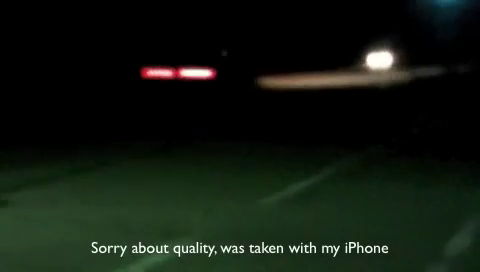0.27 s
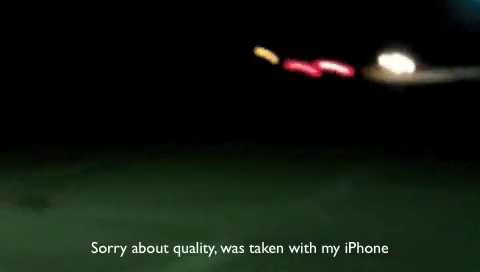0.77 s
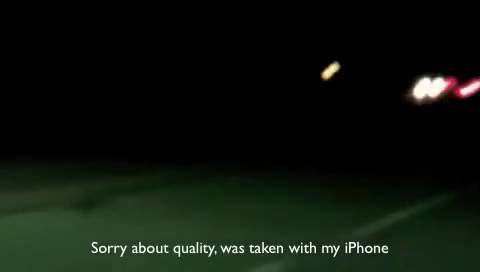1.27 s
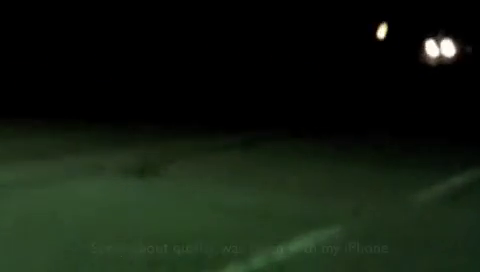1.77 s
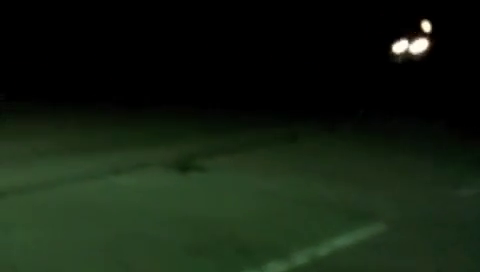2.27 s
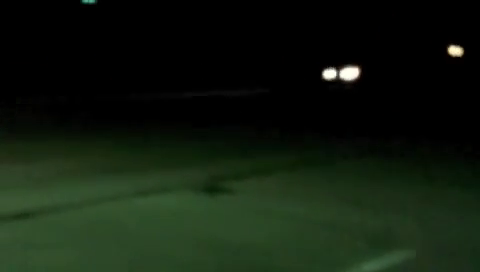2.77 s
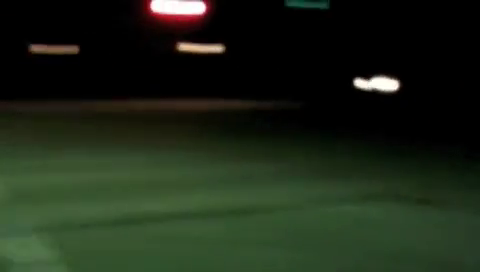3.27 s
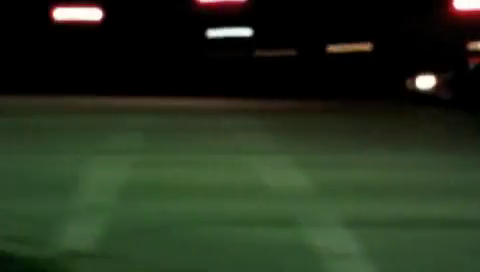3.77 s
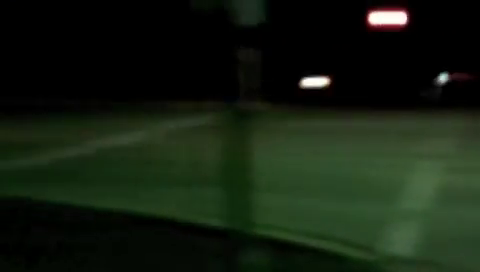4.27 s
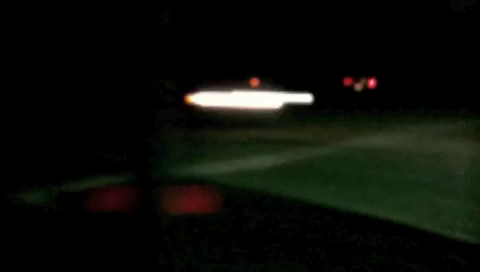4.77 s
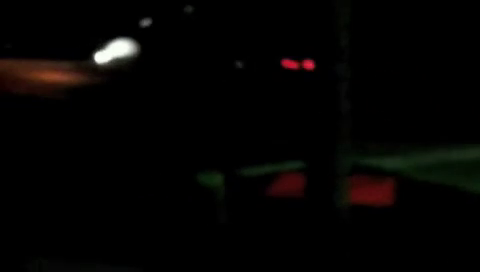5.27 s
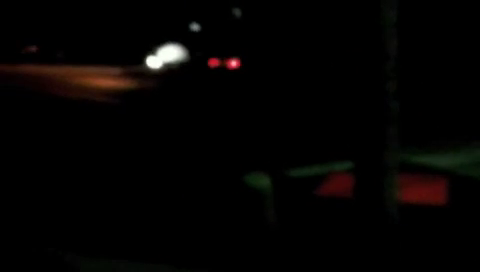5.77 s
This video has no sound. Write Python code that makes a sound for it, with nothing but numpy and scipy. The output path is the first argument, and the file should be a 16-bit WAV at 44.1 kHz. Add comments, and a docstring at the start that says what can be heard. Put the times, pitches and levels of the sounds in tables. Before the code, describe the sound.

A night roadside, heard through a small microphone with little deep bass and a cut top. From 0 s, tyre roar dominates, with the airy hiss of a car rolling away that swells slightly at about 0.25 s and fades after 0.7 s. A distant eight-cylinder exhaust drones faintly at a low-mid pitch, climbing steadily and beating in and out with reflections, stronger from 1 s. Tiny close ticks come near 1.2 and 2 s. The drone sinks a little around 2.5 to 3 s, then surges from 3.2 s, loud, raspy and rich, with thin whines and brighter tyre hiss, peaking around 3.6 to 4.7 s. At 4.8 s the throttle lifts; overtones thin and pitch slides down. At about 5.26 s the next gear bites with a brief bark, pitch plunges by 5.6 s with a short slap echo, then holds low, wobbling and burbling over tyre noise until 6 s.

```python
"""Tyre roar and the airy hiss of a car rolling away open a night road; a loud eight-cylinder nears.
Its open exhaust, a sum of firing harmonics and crank orders, climbs in pitch and fades in and out with
reflections; the overtones thin as the throttle lifts, and the pitch drops as the next gear bites.
Tyres, hiss, rumble and burble are shaped noise; passing whines and close ticks are sines."""
import sys
import numpy as np
from scipy import signal
from scipy.fft import rfft, irfft, next_fast_len
from scipy.io import wavfile
from scipy.ndimage import map_coordinates

SR = 44100
rng = np.random.default_rng(int(sys.argv[2]) if len(sys.argv) > 2 else 0)


def file_out(sig):
    """Save sig as 16-bit WAV at sys.argv[1]."""
    # one column per channel
    cols = np.atleast_2d(sig).T
    # limit, then scale
    lim = np.clip(cols, -1, 1)
    pcm = np.round(lim * 32767).astype(np.int16)
    wavfile.write(sys.argv[1], SR, pcm)


N = 265923

# Spectra are relative: their noise is scaled to rms 1 before its level is set.

# firing rate [t/s, f/Hz]
FIRING_RATE = [(0, 163.9), (.45, 166.5), (1, 173.7), (1.6, 178), (2.1, 186.5), (2.7, 190.4), (3.1, 194.7),
               (3.6, 199.1), (4, 202.3), (4.3, 203.5), (4.78, 202.7), (4.9, 194.5), (5.22, 181.3),
               (5.28, 183.9), (5.34, 180.5), (5.5, 143.8), (5.58, 130.1), (5.66, 135.5), (5.73, 137.4),
               (5.81, 135.4), (5.89, 138), (6.03, 136)]
# harmonic 1 before its fades, as the car nears [t/s, level/dB]
BOOM_LEVEL = [(0, -40), (.6, -38), (.95, -40), (1.06, -30), (1.16, -34), (1.28, -29), (1.35, -32.5),
              (1.47, -25.5), (1.52, -31.5), (1.56, -31), (1.62, -31), (1.77, -29.5), (1.82, -32.5),
              (1.87, -27.5), (1.96, -33), (2.13, -34), (2.25, -35.5), (2.35, -29.5), (2.43, -31),
              (2.5, -34.5), (2.95, -38.5), (3.3, -26), (3.63, -21), (4.05, -20.5), (4.2, -23.5), (4.3, -21),
              (4.36, -22.5), (4.44, -24), (4.5, -23), (4.7, -24), (4.92, -27.5), (5.14, -26.5), (5.22, -30),
              (5.28, -23), (5.33, -23.5), (5.38, -22), (5.47, -30), (5.7, -30.5), (5.85, -35), (6.03, -36)]
# overtones at open throttle, before fades and dip [t/s, levels of harmonics 2, 3, 4, 5 /dB]
OVERTONE_LEVELS = [(0, -60, -65, -57, -57), (.8, -53.5, -62, -67, -61), (1.15, -53.5, -59, -67, -68),
                   (1.6, -49, -63, -59.5, -62), (2.2, -50, -58, -59.5, -63), (2.8, -47.5, -58.5, -64, -61),
                   (3.05, -49.5, -52, -52, -61), (3.25, -42.5, -47, -44, -45), (3.38, -42, -50, -41.5, -56),
                   (3.5, -34.5, -48, -40, -61), (3.7, -37, -53, -42.5, -41),
                   (4.15, -37.5, -43.5, -41.5, -51), (4.3, -36.5, -43, -32, -48),
                   (4.45, -37, -36, -35, -43), (4.62, -39, -34.5, -34, -40.5), (4.8, -36.5, -39, -40, -42),
                   (5.15, -34, -47, -56, -60), (5.245, -34, -55, -55, -58), (5.27, -29, -36.5, -42.5, -58),
                   (5.35, -32, -33, -41.5, -43), (5.42, -31, -49, -42, -42), (5.52, -32.5, -51, -41, -50),
                   (5.6, -30.5, -49, -52, -45), (5.8, -33, -46, -54, -53), (5.9, -31, -47, -50, -47),
                   (6.03, -33, -47, -57, -53)]
OVERTONE_WAVER_DB = 1.3, 2.0, 2.3, 2.2  # harmonics 2 to 5
# fades of harmonic 1 against a reflection, one turn from row to row [t/s, level/dB, above 0 read as 0]
BOOM_FADES = [(.45, -3), (.72, 3), (.83, -3), (1.005, -13), (1.43, -25), (1.73, -19), (2.07, -15),
              (2.39, -31), (2.62, -7), (2.8, -17), (2.88, -1), (2.99, 0), (3.88, -7), (4.38, -11),
              (4.57, -3.5), (4.72, 8), (4.84, -13), (4.99, -1.5), (5.09, -5), (5.18, -7), (5.25, -8),
              (5.4, -6.5), (5.6, -5), (5.86, -3), (5.97, -5), (6.1, 0)]
# own fades of harmonics 2, 3 and 4, likewise [t/s, level/dB]
SECOND_FADES = [(.72, -7), (1.0, -2), (1.42, -7), (1.75, -3), (1.92, -5), (2.07, -6), (2.5, -0.5),
                (3.11, -3), (3.55, -6), (4.0, -3), (4.35, 10), (4.58, -6.5), (4.83, -11), (5.13, -6),
                (5.25, -7), (5.62, 0), (5.8, 1), (5.97, -3), (6.1, -7)]
THIRD_FADES = [(3.0, -3), (3.3, -1), (3.56, -13), (3.69, -15), (3.87, -17), (4.0, 1), (4.35, -3.5),
               (4.51, -6), (4.84, -2), (5.43, -14), (5.64, 1), (5.79, -8), (6.1, 0)]
FOURTH_FADES = [(3.0, 0), (3.24, -3), (3.51, -8), (3.65, -11), (3.76, -8), (3.9, -19), (4.02, -11),
                (4.11, -16), (4.23, -13), (4.36, -6), (4.53, -7), (4.62, 1), (4.84, -8), (5.24, 0),
                (5.56, -6), (5.8, -5), (5.96, -6)]
FIFTH_FADE_SHARE = 0.28  # share of each boom fade, in dB, that harmonic 5 takes
# ground dip the overtones pass through, placed for the rest hump [f/Hz, level/dB]
GROUND_DIP = [(250, 1), (400, 0.5), (480, -3.5), (545, -5.5), (600, -3), (690, 2.5), (800, -1.5),
              (900, -4.5), (1050, -3)]
# throttle shut, starts to open again; time to shut, to open; change in the overtones
SHUT_AT_S, BITE_S, SHUTTING_S, OPENING_S, LIFT_DB = 4.83, 5.258, 0.024, 0.02, -9
# rasp of the crank orders [f/Hz, level/dB]
RASP_SPECTRUM = [(230, -5), (310, -2.5), (420, -9), (520, -12.5), (700, -9), (900, -1), (1150, -2.5),
                 (1350, -10.5), (1650, -7.5), (1900, -5.5), (2150, -35), (2450, -8), (2900, -40)]
# level with the louder of harmonics 4 and 5 at RASP_REF_DB; share of its swing, dB per dB
RASP_DB, RASP_REF_DB, RASP_FOLLOWS = -43, -45, 0.44
# walls along the road [delay/s, level/dB]
ROADSIDE_ECHOES = [(.09, -19), (.17, -18)]
# far wall that throws the boom back while the revs drop [delay/s, level/dB]
FAR_WALL_SLAPS = [(.12, -11.5), (0.229, -21)]
SLAP_S, SLAP_END_S, SLAP_RISE_S, SLAP_FALL_S = 5.4, 5.62, 0.065, 0.14
# lines that stand out of the rasp [start t/s, end t/s, start f/Hz, end f/Hz, rms level at mid-swell/dB]
WHINE_LINES = [(1.219, 1.95, 436, 460, -58), (2.806, 3.26, 1533, 1565, -48),
               (3.399, 3.621, 940, 941, -44.5), (3.801, 4.196, 1150, 1170, -45.5),
               (3.996, 4.849, 1616, 1614, -47), (4.193, 4.79, 1670, 1675, -49),
               (4.039, 4.293, 1570, 1580, -49), (4.503, 4.89, 1056, 1046, -42.5)]

# rumble between the harmonics [f/Hz, level/dB per Hz]
RUMBLE_SPECTRUM = [(25, -61), (50, -53), (80, -19), (120, -8), (170, 11.5), (250, 4), (350, 5.5), (430, -3),
                   (520, -12.5), (700, -15)]
# level with BOOM_LEVEL at RUMBLE_REF_DB; share of its swing, dB per dB
RUMBLE_DB, RUMBLE_REF_DB, RUMBLE_FOLLOWS = -48.5, -30, 0.19
SURGE_S, SURGE_DB, SURGE_RISE_S, SURGE_FALL_S = 5.37, 7, 0.93, 0.065  # swell as the revs are dragged down
# rough exhaust noise as the next gear pulls [f/Hz, level/dB per Hz]
BURBLE_SPECTRUM = [(330, -30), (400, -1), (500, -1), (600, 1), (700, -10), (850, -32)]
BURBLE_S, BURBLE_RISE_S, BURBLE_DB = 5.5, 0.16, -49

# tyre roar [t/s, f of second hump/Hz, levels of humps 1, 2, 3 /dB, of low hiss/dB, of high hiss/dB]
ROAD_LEVELS = [(0, 1885, -40.5, -45.5, -57, -58, -61.5), (.4, 1940, -43, -45.5, -62.5, -61.5, -63.5),
               (.9, 1910, -42.5, -46.5, -63, -62.5, -67.5), (1.5, 1824, -48, -50, -61, -61, -66.5),
               (1.75, 1778, -45, -44, -57, -60.5, -65.5), (2.2, 1671, -46, -47.5, -56, -61, -67),
               (2.8, 1655, -47, -45, -54, -58.5, -62.5), (3.1, 1707, -43.5, -41.5, -48.5, -53.5, -57.5),
               (3.5, 1727, -44.5, -41.5, -47.5, -52.5, -54.5), (3.9, 1721, -42.5, -38.5, -49, -52, -53),
               (4.3, 1688, -40.5, -39, -50, -50, -50.5), (4.7, 1697, -42.5, -40, -51, -52, -53),
               (4.9, 1703, -43.5, -41, -50.5, -56.5, -56.5), (5.05, 1750, -44, -39, -52.5, -56.5, -58.5),
               (5.25, 1862, -39.5, -40.5, -53.5, -58, -60), (5.5, 1776, -46, -49.5, -56, -59, -62.5),
               (5.7, 1619, -42.5, -42, -52, -60.5, -64), (6.03, 1704, -45, -43, -54, -56.5, -63)]
# slides with the geometry [t/s, f of first hump/Hz, of third hump/Hz, of low hiss/Hz, of high hiss/Hz]
COLOUR_SLIDES = [(0, 923, 2400, 3900, 7100), (.6, 951.3, 2800, 4100, 6800), (1.2, 957, 2600, 3760, 6540),
                 (1.8, 929, 2350, 4130, 6640), (2.5, 889.6, 2370, 4020, 6700),
                 (3.2, 903.6, 2360, 3940, 6700), (4, 888, 2440, 4030, 6940), (4.8, 880.7, 2450, 4000, 6850),
                 (5.3, 927.5, 2450, 4150, 7050), (5.601, 908, 2270, 4350, 7300),
                 (6.03, 899, 2270, 3940, 6600)]
SLIDE_REST_HZ = 900, 2400, 4000, 6800  # same four columns, where the spectra put them
HUMP_REST_HZ = 1720  # second hump
# humps between ground-reflection dips [f/Hz, level/dB per Hz]
FIRST_HUMP = [(380, -12), (440, -13), (530, -27), (600, -11), (670, -6), (800, 2.5), (1000, 1), (1200, -5),
              (1400, -11.5), (1700, -31.5)]
SECOND_HUMP = [(1100, -28), (1350, -8), (1550, 0.5), (1750, 3), (1950, -1), (2150, -11.5), (2500, -31.5)]
THIRD_HUMP = [(1900, -51), (2150, -3), (2500, -1.5), (2750, -7.5), (3100, -23), (3600, -37)]
# flicker of humps 1, 2, 3, for each of two drifts [level/dB]
HUMP_FLICKER_DB = [0.45, 0.5, 0.96]
# tyre hiss, low and high band [f/Hz, level/dB per Hz]
LOW_HISS = [(2700, -8), (3000, -2), (3250, -5.5), (3600, 2), (4000, 0), (4800, -2), (5400, -6), (6000, -12)]
HIGH_HISS = [(5000, -40), (5800, -10), (6500, -0.5), (7200, -3.5), (7900, -7.5), (9500, -5), (10300, -14.5),
             (12000, -22), (13300, -21.5), (14500, -25), (15700, -21), (16500, -47)]

# airy hiss of the car rolling away [f/Hz, level/dB per Hz]
LEAVING_HISS = [(4800, -28), (5300, -2.5), (5700, -7), (6400, 3), (7400, 0), (8000, -18), (9000, -21),
                (10500, -15), (11500, -28)]
LEAVING_S, LEAVING_HOLD_S, LEAVING_DB, LEAVING_RISE_S = 0.24, 0.48, -59.5, 0.07
LEAVING_BEFORE_DB, LEAVING_FADE_DB_PER_S, LEAVING_FLICKER_DB = -5, -37, 0.6
# its tyres, lower down [f/Hz, level/dB]
LEAVING_ROAR = [(260, -30), (340, -3), (450, -0.5), (530, -6), (600, -25), (1100, -24), (1300, -5),
                (1500, 0), (1700, -25)]
LEAVING_ROAR_DB, LEAVING_ROAR_DB_PER_S = -50, -8.5

# small ticks close by [t/s, level before rise and decay/dB, f/Hz, t60/s]
CLOSE_TICKS = [(1.1688, -47, 8000, .004), (1.1715, -38, 6700, .005), (1.182, -41, 5910, .004),
               (1.9673, -34, 10000, 0.0022)]
TICK_RISE_S = 0.0004
CUTOFF_HZ = 15750  # 60 dB down from here up


def exhaust(cycles):
    """Firing harmonics plus rasp; walls return the rasp, and a far wall the boom as revs drop."""
    lift_db = LIFT_DB * pulse(SHUT_AT_S, BITE_S, SHUTTING_S, OPENING_S)
    overtones_db = in_time(OVERTONE_LEVELS) + lift_db
    swells = beating(BOOM_FADES)
    boom = swells * from_db(in_time(BOOM_LEVEL)[0]) * partial(cycles, 1, waver_db=0.98, wander=0.033)
    tones = overtones(cycles, overtones_db, swells)
    slap_gate = pulse(SLAP_S, SLAP_END_S, SLAP_RISE_S, SLAP_FALL_S)
    slaps = slap_gate * walls(boom, FAR_WALL_SLAPS)
    buzz = rasp(cycles, overtones_db)
    return boom + tones + slaps + buzz + walls(buzz)


def overtones(cycles, levels_db, swells):
    """Harmonics 2 to 5, each with its fades, through a ground dip that slides with the second road hump."""
    fades = [beating(SECOND_FADES), beating(THIRD_FADES), beating(FOURTH_FADES), swells ** FIFTH_FADE_SHARE]
    # scaling the frequency slides the dip
    seen_hz = in_time(FIRING_RATE)[0] * HUMP_REST_HZ / in_time(ROAD_LEVELS)[0]
    dip_hz, dip_db = np.transpose(GROUND_DIP)
    out = np.zeros(N)
    for harmonic, db, fade, waver_db in zip(range(2, 6), levels_db, fades, OVERTONE_WAVER_DB):
        through_dip_db = np.interp(harmonic * seen_hz, dip_hz, dip_db)
        gain = from_db(db + through_dip_db + 0.3 * drift(11.0)) * fade
        out += gain * partial(cycles, harmonic, waver_db, wander=0.076)
    return out


def rasp(cycles, overtones_db):
    """Weak lines at the crank orders: the four firings of a turn are uneven."""
    # multiples of the firing rate; whole ones up to 5 are the harmonics
    multiples = [k / 4 for k in range(5, 50) if k % 4 or k > 20]
    lines = sum(partial(cycles, multiple, waver_db=5.5, wander=0.06) for multiple in multiples)
    swing_db = overtones_db[2:].max(axis=0) - RASP_REF_DB
    return from_db(RASP_DB + RASP_FOLLOWS * swing_db) * rms_one(shape(lines, RASP_SPECTRUM))


def whines():
    """Gliding sines, each swelling and fading once."""
    out, t = np.zeros(N), np.arange(N) / SR
    for start_s, end_s, start_hz, end_hz, db in WHINE_LINES:
        done = np.clip((t - start_s) / (end_s - start_s), 0, 1)
        hz = start_hz + (end_hz - start_hz) * done
        phase = 2 * np.pi * np.cumsum(hz) / SR + 0.76 * drift(6.3)
        swell = np.sqrt(2 * np.sin(np.pi * done).clip(0))
        out += from_db(db + 2.1 * drift(7.6)) * swell * np.sin(phase)
    return out


def rumble():
    """Low exhaust noise: follows the boom a little, swells at the gear change."""
    swing_db = in_time(BOOM_LEVEL)[0] - RUMBLE_REF_DB
    surge_db = SURGE_DB * pulse(SURGE_S, SURGE_S, SURGE_RISE_S, SURGE_FALL_S)
    level_db = RUMBLE_DB + RUMBLE_FOLLOWS * swing_db + surge_db
    return from_db(level_db) * coloured(RUMBLE_SPECTRUM, patchy_db=2.5)


def burble():
    """Under the load of the next gear, rough noise fills the gap between the overtones."""
    swell = pulse(BURBLE_S, N / SR, BURBLE_RISE_S, 1)
    return from_db(BURBLE_DB) * swell * coloured(BURBLE_SPECTRUM, patchy_db=3.5)


def road(cycles):
    """Tyre noise humps between sliding ground-reflection dips; hiss swells a little with each firing."""
    second_hz, *humps_db, low_db, high_db = in_time(ROAD_LEVELS)
    first, third, low, high = (hz / rest for hz, rest in zip(in_time(COLOUR_SLIDES), SLIDE_REST_HZ))
    humps = FIRST_HUMP, SECOND_HUMP, THIRD_HUMP
    slides = first, second_hz / HUMP_REST_HZ, third
    roar = np.zeros(N)
    for hump, db, flicker_db, slide in zip(humps, humps_db, HUMP_FLICKER_DB, slides):
        roar += from_db(db) * coloured(hump, flicker_db, slide)
    low_hiss = from_db(low_db) * coloured(LOW_HISS, 0.47, low)
    high_hiss = from_db(high_db) * coloured(HIGH_HISS, 0.65, high)
    firing_swell = 1 + 0.053 * np.sin(2 * np.pi * cycles)
    return roar + (low_hiss + high_hiss) * firing_swell


def leaving():
    """The other car's hiss opens up, holds, then fades with distance; its roar fades from the start."""
    t = np.arange(N) / SR
    before_db = LEAVING_BEFORE_DB * np.clip((LEAVING_S - t) / LEAVING_RISE_S, 0, 1)
    after_db = LEAVING_FADE_DB_PER_S * np.maximum(t - LEAVING_S - LEAVING_HOLD_S, 0)
    hiss = from_db(LEAVING_DB + before_db + after_db) * coloured(LEAVING_HISS, LEAVING_FLICKER_DB)
    roar_db = LEAVING_ROAR_DB + LEAVING_ROAR_DB_PER_S * t
    return hiss + from_db(roar_db) * coloured(LEAVING_ROAR, patchy_db=2.0)


def ticks():
    """Sines that start fast and decay within milliseconds."""
    out, t = np.zeros(N), np.arange(300) / SR
    for s, db, hz, t60_s in CLOSE_TICKS:
        at = round(s * SR)
        envelope = from_db(db - 60 * t / t60_s) * np.minimum(t / TICK_RISE_S, 1)
        out[at:at + len(t)] += envelope * np.sin(2 * np.pi * hz * t)
    return out


def partial(cycles, multiple, waver_db, wander):
    """One engine order, rms 1 before its waver in level; phase wanders as firings and air vary."""
    start = rng.uniform(0, 2 * np.pi)
    phase = 2 * np.pi * multiple * cycles + wander * multiple * drift(17.3) + start
    return np.sqrt(2) * from_db(waver_db * drift(17.7)) * np.sin(phase)


def beating(fades):
    """Direct sound plus one reflection, one phase turn between fades: round lobes, sharp nulls."""
    s, depth_db = np.transpose(fades)
    null_gain = np.minimum(from_db(depth_db), 1)
    turns, null = in_time(np.c_[s, np.arange(len(s)), null_gain])
    echo = (1 - null) / (1 + null)
    return np.abs(1 - echo * np.exp(2j * np.pi * turns)) / (1 + echo)


def walls(x, echoes=ROADSIDE_ECHOES):
    """Late copies; they beat against the direct tone while the pitch moves."""
    return sum(from_db(db) * np.pad(x, (round(s * SR), 0))[:N] for s, db in echoes)


def coloured(spectrum, patchy_db, stretch=1):
    """Flickering noise of this spectrum, read faster or slower so its humps slide; rms 1."""
    noise = shape(rng.standard_normal(next_fast_len(2 * N)), spectrum)
    read_at = np.cumsum(stretch * np.ones(N))
    slid = map_coordinates(noise, [read_at], order=3, mode="wrap")
    return rms_one(slid * from_db(patchy_db * (drift(6.9) + drift(10.0))))


def shape(x, spectrum):
    """Filter x by this spectrum, interpolated over log frequency; -90 dB outside it."""
    hz = np.maximum(np.fft.rfftfreq(len(x), 1 / SR), 1)
    point_hz, point_db = np.transpose(spectrum)
    gain_db = np.interp(np.log(hz), np.log(point_hz), point_db, -90, -90)
    return irfft(rfft(x) * from_db(gain_db), len(x))


def drift(rate_hz):
    """Slow chance: noise through a double one-pole low-pass, spread 1."""
    step = 40  # samples per drift value
    pole = np.exp(-2 * np.pi * rate_hz * step / SR)
    noise = rng.standard_normal(N // step + 2002)
    slow = signal.lfilter([1], [1, -2 * pole, pole * pole], noise)[2000:]  # settled part
    return np.interp(np.arange(N) / step, np.arange(len(slow)), rms_one(slow))


def pulse(start_s, end_s, rise_s, fall_s):
    """0 to 1 and back: rises up to the start, holds, falls after the end."""
    corners_s = [start_s - rise_s, start_s, end_s, end_s + fall_s]
    return np.interp(np.arange(N) / SR, corners_s, [0, 1, 1, 0])


def in_time(rows):
    """Columns of a curve, one value a sample."""
    s, *columns = np.transpose(rows)
    return [np.interp(np.arange(N) / SR, s, column) for column in columns]


def rms_one(x):
    """Scale to rms 1."""
    return x / np.sqrt(np.mean(x ** 2) + 1e-20)


def from_db(db):
    """dB to gain."""
    return 10 ** (np.asarray(db) / 20)


def scene():
    """Both cars and the ticks, one channel."""
    cycles = np.cumsum(in_time(FIRING_RATE)[0]) / SR  # firings so far
    lines = whines()
    engine = exhaust(cycles) + lines + walls(lines) + rumble() + burble()
    return (engine + road(cycles) + leaving() + ticks())[None]


def record(dry):
    """The small microphone drops the deep bass; the top is cut."""
    thin = signal.sosfilt(signal.butter(2, 60, "high", fs=SR, output="sos"), dry)
    return signal.sosfilt(signal.cheby2(22, 60, CUTOFF_HZ, fs=SR, output="sos"), thin)


dry = scene()
out = record(dry)
file_out(out)
```